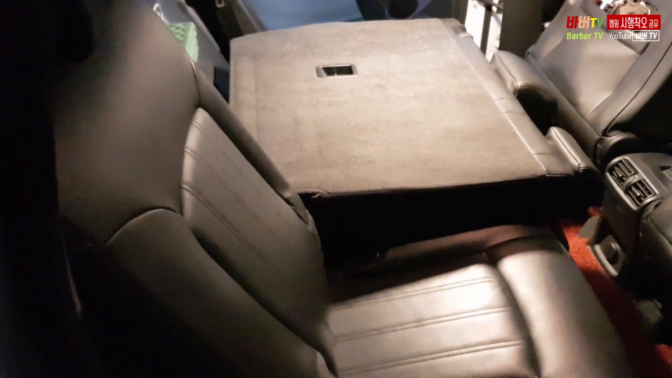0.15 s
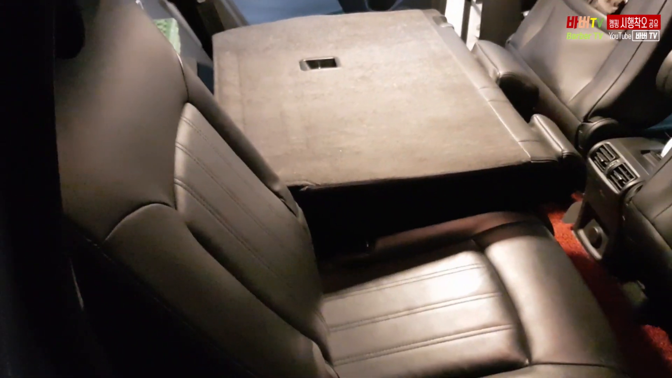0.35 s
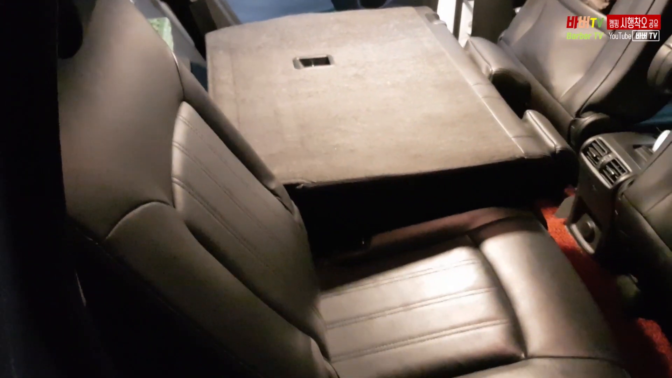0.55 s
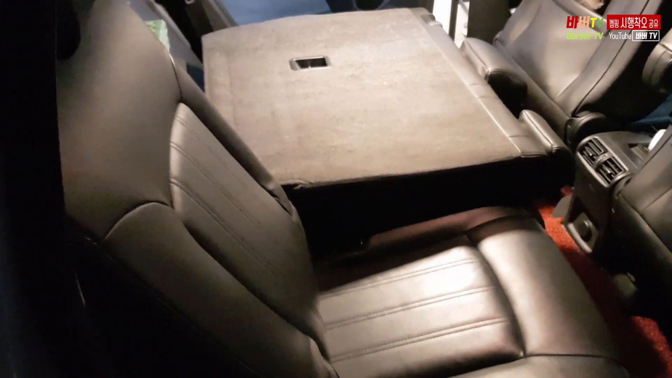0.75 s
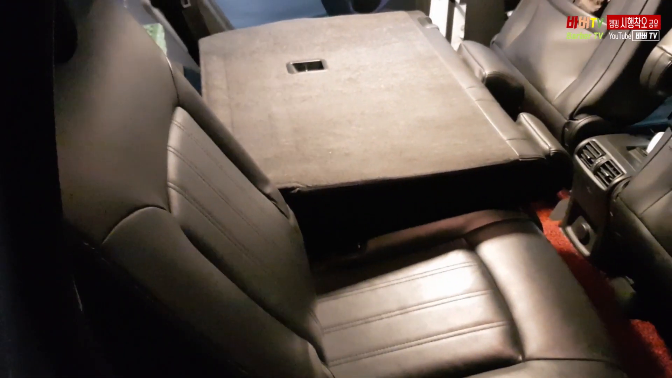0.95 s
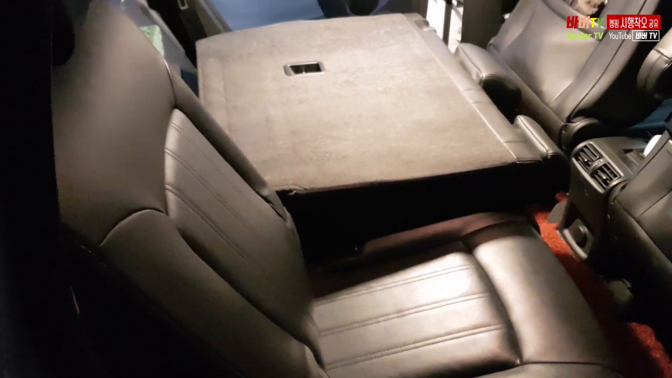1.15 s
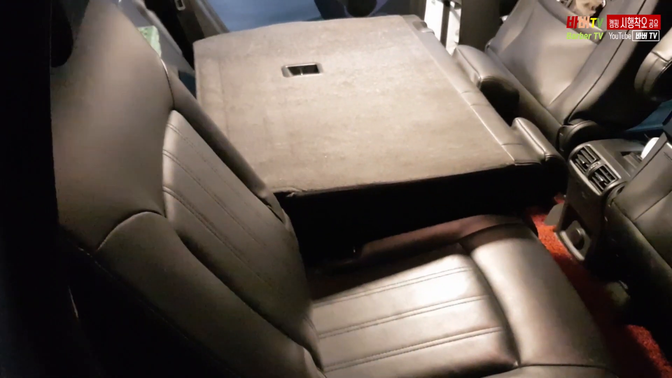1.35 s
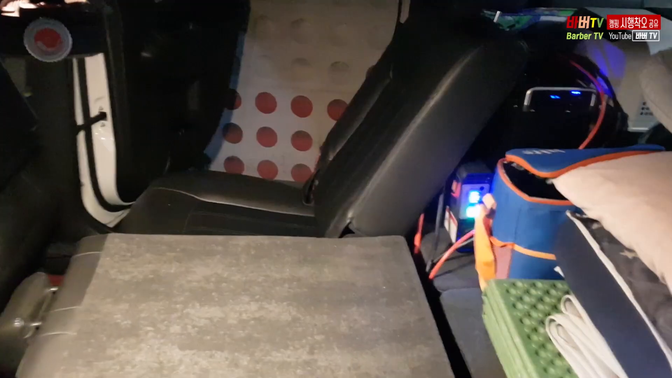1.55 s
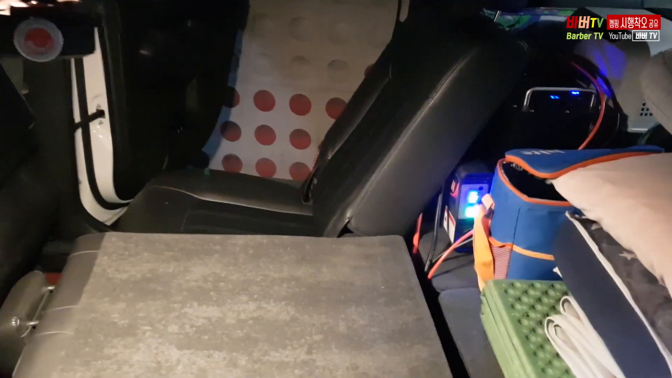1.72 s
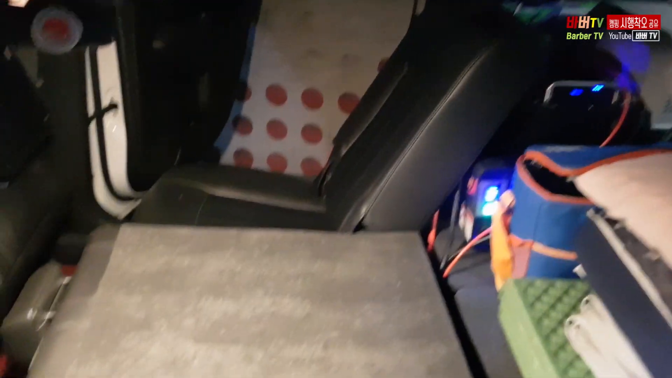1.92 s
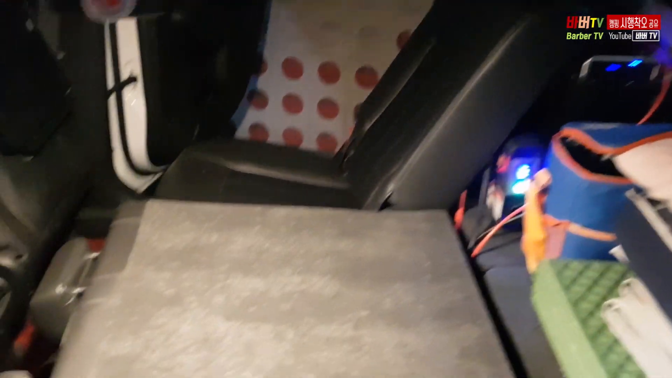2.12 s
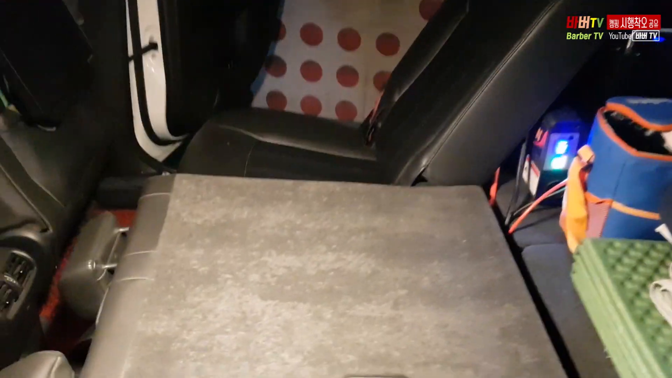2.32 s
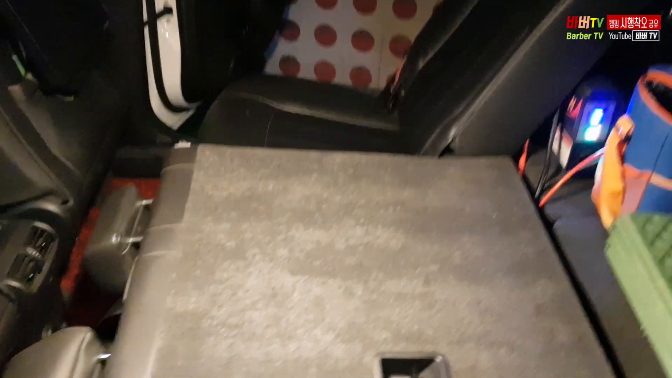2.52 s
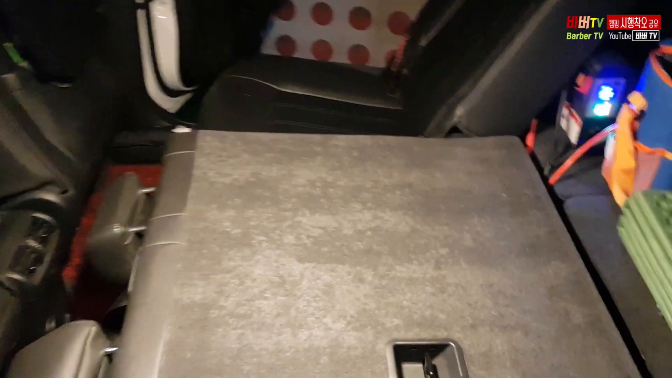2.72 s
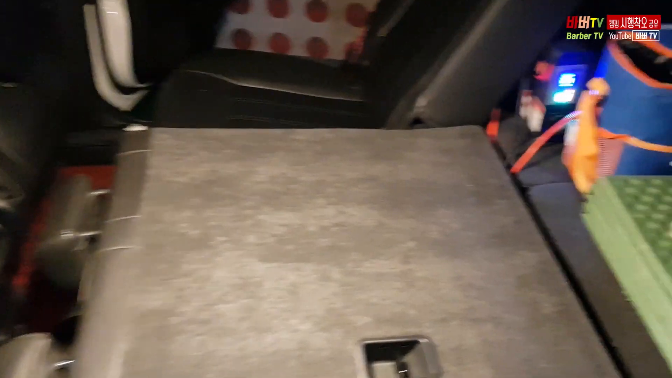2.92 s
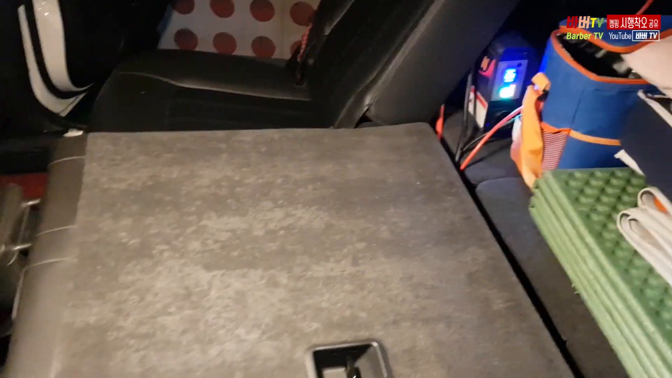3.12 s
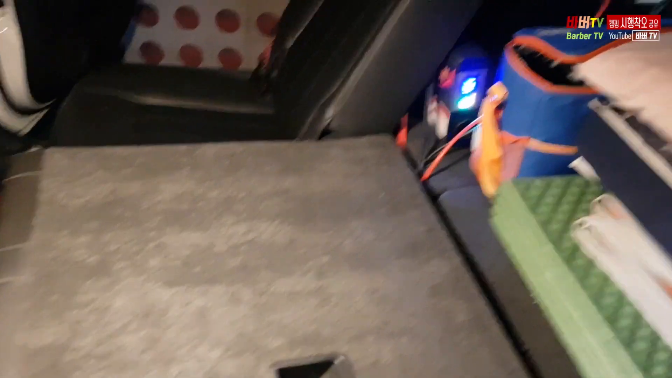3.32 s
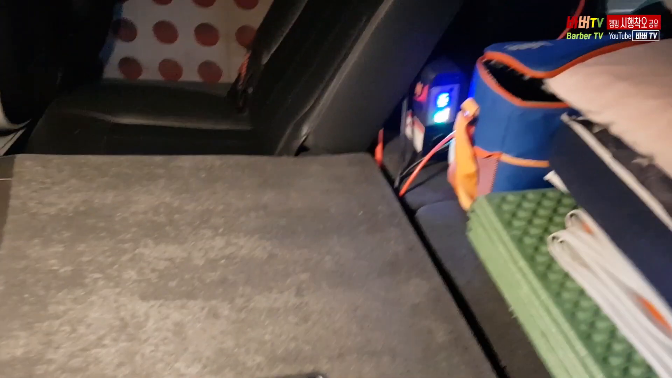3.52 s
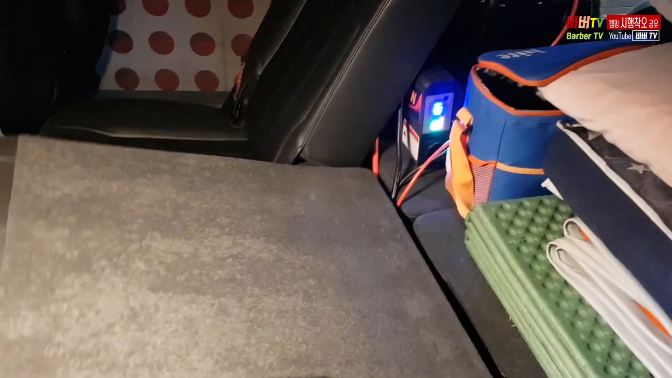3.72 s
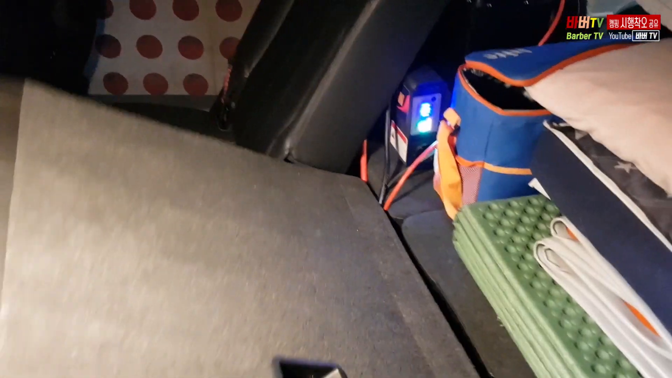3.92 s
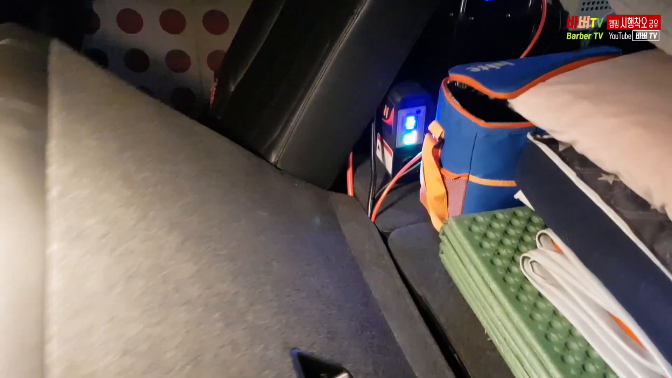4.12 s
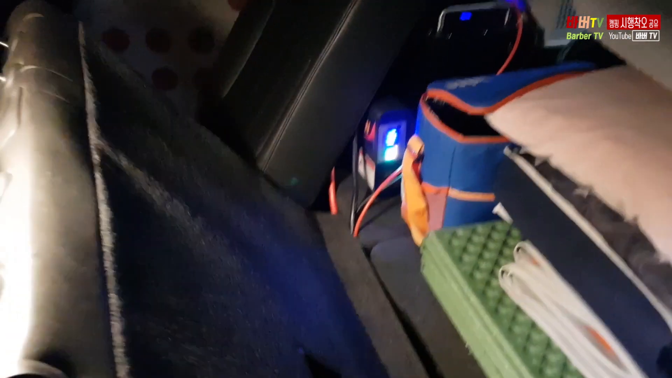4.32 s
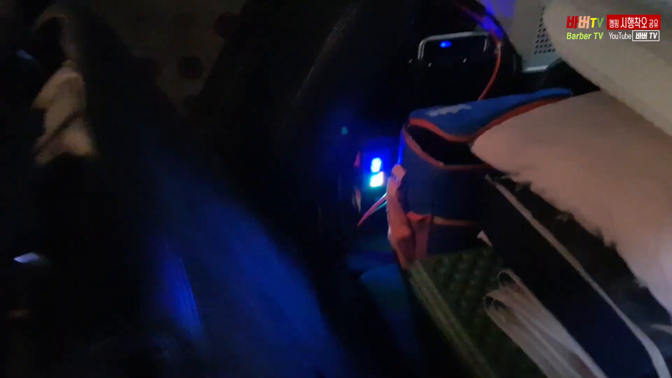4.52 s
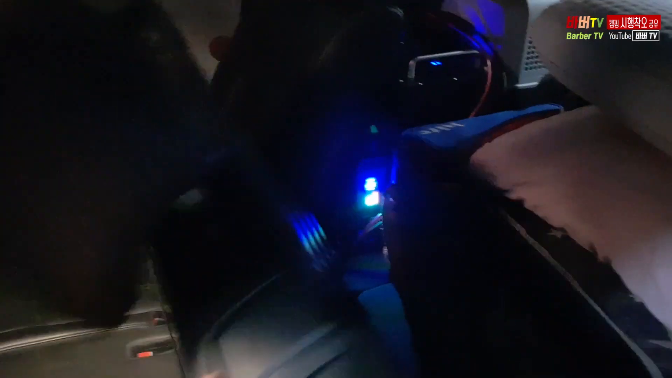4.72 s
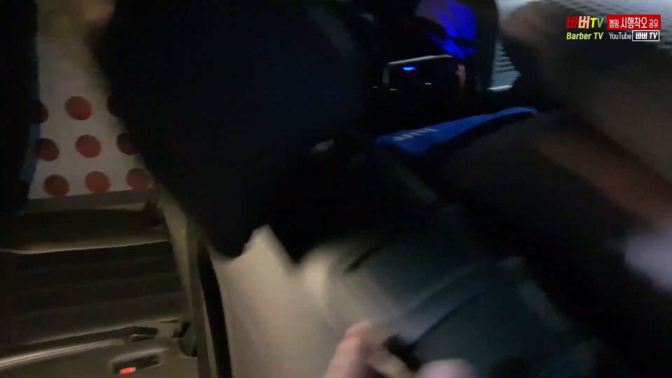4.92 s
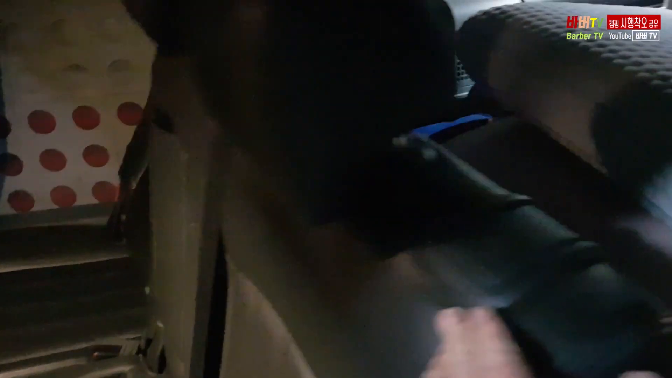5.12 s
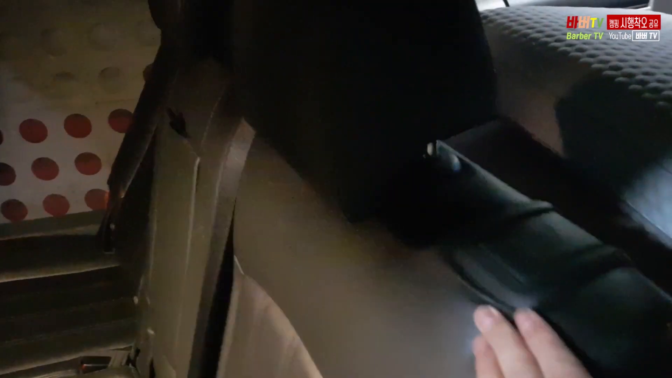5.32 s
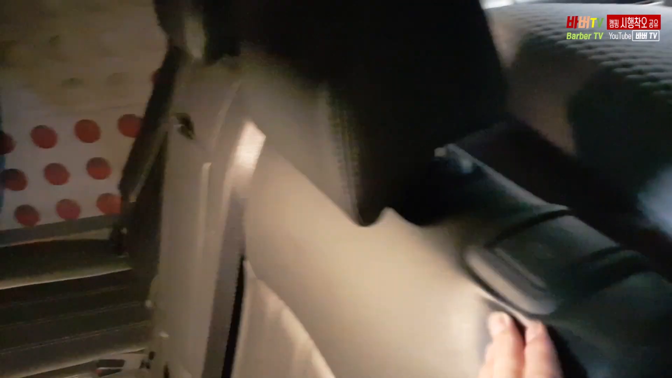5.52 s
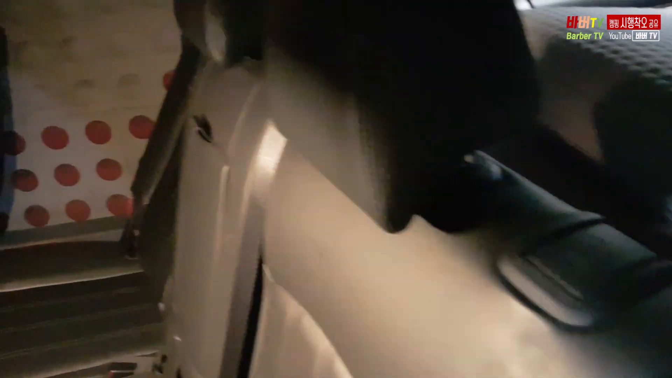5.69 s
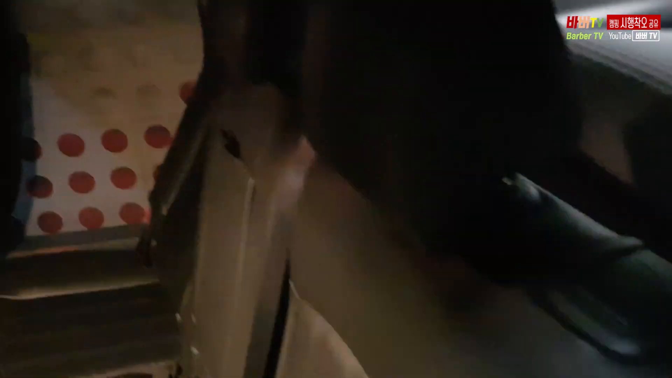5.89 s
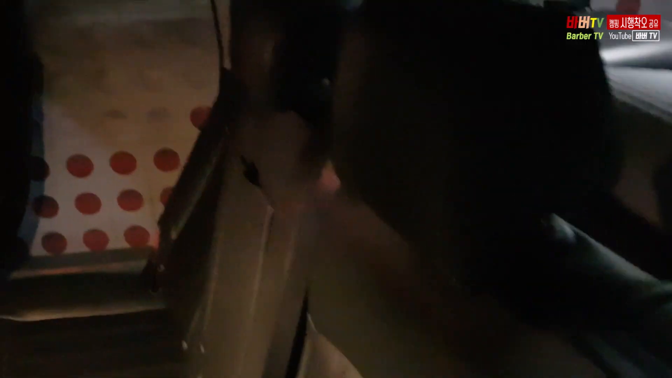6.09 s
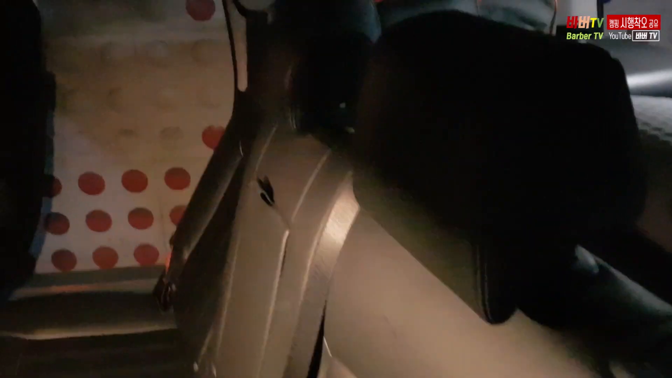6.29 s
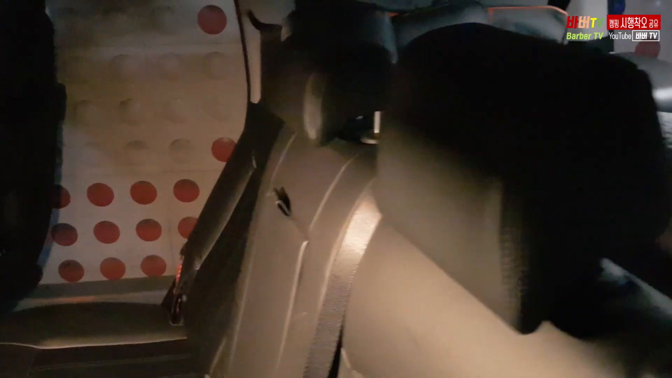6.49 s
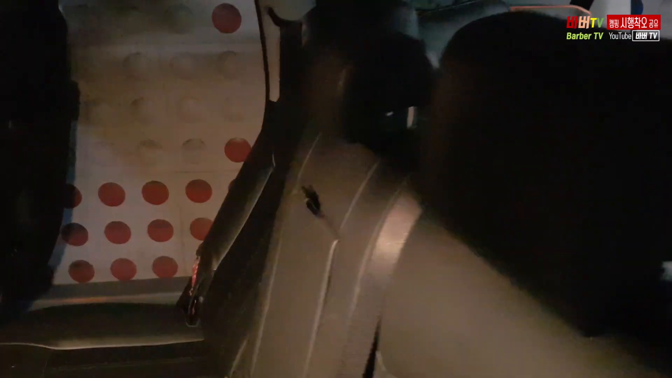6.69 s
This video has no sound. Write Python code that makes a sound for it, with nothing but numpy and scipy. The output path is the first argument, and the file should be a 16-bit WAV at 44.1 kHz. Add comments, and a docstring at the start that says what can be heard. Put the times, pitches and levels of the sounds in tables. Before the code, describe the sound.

Close stereo handheld microphone in a small padded car cabin. A rear seatback latch clacks with short squeaks and leather rubbing, then near quiet with faint cloth swishes. Light ticks and rustles follow, a double clunk just past three seconds, then a dense run of clacks, leather scrapes and bright belt-tongue jingling, ending in a heavy locking thud that leaves trim buzzing, then low rumble.

```python
"""A latch clacks and squeals while leather rubs: a rear seatback is folded and latched in a parked car.
Cloth swishes; later the frame thuds into its stops, a belt tongue jingles, a spring pings.
Contacts and rubbing are shaped noise; squeals, thuds, tongue and spring are sums of sines.
Low noise rumbles underneath, trim buzzes after the lever release and heavy blows;
heard from a hand-held stereo microphone."""
import sys
import numpy as np
from scipy import signal
from scipy.fft import rfft, irfft, next_fast_len
from scipy.io import wavfile

SR = 44100
rng = np.random.default_rng(int(sys.argv[2]) if len(sys.argv) > 2 else 0)


def boost(x):
    """Linear amplitude factor 10**(x/20) for a level x in decibels (scalar or array-like)."""
    u = np.asarray(x, float) / 20
    return 10 ** u


def file_out(sig):
    """Save sig as 16-bit WAV at sys.argv[1]."""
    # one column per channel
    cols = np.atleast_2d(sig).T
    # limit, then scale
    lim = np.clip(cols, -1, 1)
    pcm = np.round(lim * 32767).astype(np.int16)
    wavfile.write(sys.argv[1], SR, pcm)


N = 297660

# Levels are relative: band trims and pans in the functions add to them. Positive pan: left louder.
# steady hiss spectrum: f/Hz, density/dB per Hz
HISS = [(410, -29.5), (700, -3.5), (864, -8), (1950, -6), (8750, -19.5), (12000, -9.5), (15000, -7.5),
        (16200, -16)]
# correlation of left and right noise: f/Hz, correlation
LIKENESS = [(60, 0.96), (180, 0.94), (550, 0.64), (1650, 0.047), (4970, 0.054), (15000, 0.037)]
# cabin reflection tails: upper edge/Hz, level/dB, t60/s
CABIN = [(2500, -19, .22), (12000, -17, .07)]
# seat and cabin shudder: t/s, deep level/dB, upper level/dB
SHUDDER = [(0.0, -41, -59), (0.3, -48, -55), (0.64, -48, -61), (0.94, -52.5, -72.5), (0.99, -48, -52.5),
           (1.18, -49.5, -65), (1.4, -43, -62), (1.75, -48.5, -60), (2.18, -50.5, -60.5),
           (2.76, -61, -66.5), (3.0, -54, -59.5), (3.55, -58, -46.5), (4.4, -49, -47), (4.6, -47, -34),
           (5.04, -43.5, -41.5), (5.3, -46.5, -43.5), (5.95, -49, -63.5), (6.75, -46, -62)]
# deep shudder spectrum: f/Hz, density/dB per Hz
DEEP = [(12, -35.5), (20, -14), (38, -4.5), (54, 2), (110, -10.5), (130, -6.5), (170, -37.5), (290, -120)]
# upper shudder spectrum: f/Hz, density/dB per Hz
UPPER = [(65, -35), (110, -0.5), (226, -4.5), (265, -5.5), (412, -12), (487, -15), (544, -18.5), (685, -21),
         (1000, -25.5), (1300, -49), (2200, -120)]
# lever release and heavy blows that leave trim buzzing:
# t/s, trim buzz/dB, extra for its lowest bands/dB, shudder/dB
AFTERSHAKE = [(.165, -35, -21.5, -60), (3.247, -35, 0.5, -33), (5.273, -25.5, -2, -14.5)]
# buzzing trim bands: low edge/Hz, high edge/Hz, level/dB, t60/s
TRIM_BANDS = [(590, 1000, 1, 0.5), (1060, 1770, -1.5, 0.88), (1624, 2200, -0.5, 0.32),
              (2627, 4500, -14, 0.26)]
# car body rocking, one event: t/s, level/dB, f/Hz, t60/s
SWAY = (5.285, -23, 44, 1.1)
# cloth strokes: start/s, crest/s, end/s, level/dB
SWISHES = [(0.72, 0.82, 1.06, -59.5), (0.93, 1.0, 1.14, -66), (1.2, 1.3, 1.53, -57)]
# cloth spectrum: f/Hz, density/dB per Hz
CLOTH = [(710, -17), (1200, -3), (1870, 0.5), (2330, -5), (2470, -3.5), (5240, 1), (7580, -4), (8500, -18),
         (11000, -51), (18700, -120)]
# finger taps: t/s, level/dB
TAPS = [(1.589, -49.5), (1.634, -54), (1.6661, -27), (5.605, -24.5)]
# small spring pings: t/s, level/dB
PINGS = [(5.4085, -55), (5.5574, -53), (5.67, -48), (5.7947, -57.5)]
# spring modes: f/Hz, level/dB, t60/s
SPRING = [(4430, -1, 0.1), (4560, -11, 0.24), (4600, -13, .15)]
# rustle of the moving seat: t/s, body level/dB, treble re body/dB, pan of leather rub and rasp/dB
RUSTLE = [(0, -46.5, -13.5, 0.5), (.28, -46.5, -18, 4.5), (.5, -64, -17.5, 1), (.7, -76, 5, 2.5),
          (1.55, -78.5, -1.5, 5), (1.7, -68, 0.5, 5.5), (1.8, -63.5, -4, -7), (2.15, -69.5, -2, -4),
          (2.25, -76.5, -1, 1), (2.5, -78.5, 2.5, -5), (2.8, -66.5, 6.5, -0.5), (3.2, -58.5, -1.5, -2),
          (3.7, -59, -8, -5), (4.0, -58, -2, -6.5), (4.2, -49, -7.5, -5), (4.7, -46, -1.5, -1),
          (4.9, -48.5, -5, 0), (5.24, -54, -3.5, -0.5), (5.45, -74, 2.5, -1), (5.95, -80.5, 5, 3.5),
          (6.2, -95, 1, 2)]
# leather strokes (abrupt ones have a nominal end before the crest):
# start/s, crest/s, nominal end/s, body level at crest/dB, treble re body/dB
RUBS = [(0.0, 0.001, 0.044, -31.5, -17), (0.026, 0.06, 0.17, -17.5, -19.5),
        (0.153, 0.161, 0.235, -31.5, -12), (1.593, 1.599, 1.66, -73, 12), (1.767, 1.82, 1.895, -47.5, -5.5),
        (1.931, 1.952, 2.035, -46.5, -7), (2.518, 2.675, 2.756, -47, -6.5), (3.021, 3.042, 3.12, -51, -5.5),
        (3.079, 3.11, 3.2, -48, -8), (3.218, 3.219, 3.214, -34, -10.5), (3.29, 3.3, 3.37, -48.5, -3.5),
        (3.427, 3.441, 3.62, -49, -13.5), (4.013, 4.023, 4.12, -35, -9), (4.191, 4.355, 4.4, -33.5, -9),
        (4.463, 4.5, 4.55, -35.5, -13.5), (4.553, 4.563, 4.53, -24, -6), (4.581, 4.598, 4.7, -34.5, -5.5),
        (4.764, 4.772, 4.82, -40, -5.5), (4.984, 4.999, 5.01, -40, -6), (5.25, 5.257, 5.35, -27.5, -19),
        (5.602, 5.66, 5.69, -64.5, 10)]
# leather body spectrum: f/Hz, density/dB per Hz
RUB_BODY = [(410, -47), (700, -28.5), (900, -22.5), (1190, -11.5), (1650, -4.5), (2050, 0), (2350, -4.5),
            (2710, -9), (3500, -11.5), (6000, -25), (9000, -69.5)]
# leather treble spectrum: f/Hz, density/dB per Hz
RUB_TREBLE = [(2060, -24.5), (3500, -7.5), (5090, -3), (5640, -5), (6490, -1), (7460, 2), (8150, -5),
              (10400, -6), (11800, -4.5), (14600, -15), (16000, -18.5)]
# latch lever squeals: crest/s, level/dB, f at crest/Hz, time to -11 dB/s, glide/Hz per s
SQUEALS = [(0.04, -13, 2350, 0.0058, 1), (0.064, -12.5, 2270, 0.0038, 4.5), (0.074, -15, 1817, .008, 3),
           (0.133, -4.5, 2280, 0.0032, -0.5), (0.143, -13.5, 2270, 0.0036, 0),
           (0.149, -15, 2020, 0.0026, -1.5), (.1565, -5.5, 2260, 0.0026, -1),
           (0.162, -19.5, 2290, 0.0034, 2), (3.114, -45, 1140, 0.014, 2514),
           (3.141, -45.5, 1212, 0.022, 3500), (5.86, -64, 1325, 0.049, -600)]
# belt tongue touches: t/s, high groups/dB, lowest group/dB, middle groups/dB
JINGLES = [(4.5665, -26.5, -35.5, -30.5), (4.5941, -28, -39, -32), (4.6094, -26, -38.5, -34),
           (4.6458, -21.5, -30.5, -24.5), (4.664, -14.5, -25, -28.5), (4.6895, -30, -34, -31),
           (4.7159, -37, -33, -40), (4.7462, -28, -20.5, -39), (4.7552, -24.5, -29.5, -42),
           (4.7746, -34.5, -32.5, -43), (4.8614, -65, -41, -72), (4.8978, -44, -36.5, -55),
           (4.9222, -35, -32, -47), (4.9571, -28.5, -38, -30), (4.9632, -27.5, -24.5, -35),
           (4.9773, -27, -25.5, -32), (5.0013, -39, -33.5, -38), (5.0176, -41, -32, -45),
           (5.0681, -36.5, -50, -44), (5.098, -49.5, -57.5, -60)]
# belt tongue modes in five groups: f/Hz, level/dB, t60 without webbing/s
TONGUE = [
    [(13782, 0, .2)],
    [(7420, 0, .1), (8210, -15, .3)],
    [(10525, 0, .3)],
    [(11955, 0, .4)],
    [(14086, 0, .2), (12592, -6, .08)],
]
# frame blows: t/s, knock level/dB, deep swing level/dB, swing f/Hz, nominal t60/s
THUDS = [(1.665, -33.5, -21, 86, 0.092), (3.242, -19, -44, 80, 0.36), (3.261, -27, -22, 88.2, 0.29),
         (3.277, -17, -41, 72, .14), (3.309, -24.5, -31, 109.9, 0.32), (3.336, -29.5, -20.5, 80.4, 0.24),
         (3.436, -42, -38, 85.92, 0.17), (3.968, -34.5, -30.5, 91.3, 0.12), (4.388, -18.5, -29, 113, 0.23),
         (4.405, -23.5, -33, 111, 0.12), (4.439, -18, -37, 108.7, 0.086), (4.663, -21.5, -37, 95, 0.12),
         (4.68, -28.5, -20.5, 55.4, 0.091), (4.983, -24, -32.5, 99.53, .31), (5.011, -29.5, -33, 51, 0.1),
         (5.269, -12, -22, 109.9, .3), (5.287, -9.5, -14.5, 114, 0.16), (5.3, -19.5, -37, 59, 0.27),
         (5.347, -21.5, -14, 90.7, 0.19), (5.41, -41, -20, 45.8, 0.11)]
# seat frame modes: f/Hz, level/dB, t60 as share of the blow's nominal t60
FRAME = [(161.1, -3.5, 0.8), (200.2, -2.5, .7), (256, -2.5, .7), (310, -3.5, .6), (389, -5.5, 0.49),
         (482, -8, .5), (626, -16, .25), (804, -15.5, .12)]
# latch and trim contacts: t/s, level/dB, edge re body/dB, treble/dB, pan/dB
CLACKS = [(0.025, -8.5, -15.5, -38, 2.5), (0.063, -17, -23.5, -36, -0.5), (0.123, -16, -14.5, -31.5, 0),
          (0.151, -10.5, -10, -28, -3.5), (1.587, -50, -21, -12, -5), (1.633, -58, -10, 15, 4),
          (1.666, -34, -7, 2, -3), (1.776, -46.5, -1.5, -3, 3), (1.801, -37.5, -6.5, -13.5, 2.5),
          (1.821, -36.5, -14, -9.5, -5.5), (1.833, -39.5, -3.5, -6, -1.5), (1.856, -34.5, -10.5, -6, -7.5),
          (1.884, -39, -11, -12.5, 3), (1.937, -42, 1.5, -15, -2.5), (2.016, -43, -9, -20, -3.5),
          (2.157, -54.5, -7.5, 3, 10), (2.524, -45.5, 4.5, -30, -8), (2.665, -38, -6, -2.5, -7),
          (2.922, -44, -7, 2, -5), (3.017, -43, -15, -5.5, -8.5), (3.03, -43, -23, 5.5, -2),
          (3.124, -32.5, -10.5, -22.5, -4.5), (3.222, -32, -12, -12, -4.5), (3.242, -14, -15.5, -13.5, 0.5),
          (3.279, -16, -28.5, -19.5, 1), (3.337, -30.5, -15, -22, 3), (3.589, -41, -25.5, -12.5, 1.5),
          (3.616, -39, -39, -21, -15), (3.94, -43.5, -27, -5.5, -1.5), (4.014, -20, -21, -13.5, -6.5),
          (4.032, -32, -20, -9.5, -10.5), (4.067, -31.5, -14, -14, -10.5), (4.094, -32.5, -14, -7, -4.5),
          (4.145, -29, -22.5, -10, -5.5), (4.194, -31.5, -22.5, -14, -8), (4.307, -27, -8.5, -17, -8.5),
          (4.334, -23.5, -7, -10.5, -1.5), (4.347, -20.5, -13.5, -10.5, -5), (4.385, -4, -17, -19, -1),
          (4.44, -5, -13.5, -8, -1), (4.566, -0.5, -6.5, -19, 2.5), (4.646, -18.5, -8.5, 0, -2),
          (4.66, -13.5, -9, 1.5, 2.5), (4.677, -25.5, -6, 5.5, -4), (4.747, -15.5, -7.5, -9.5, 1.5),
          (4.804, -21.5, -4, -13, 2.5), (4.825, -25, -5.5, -18, 2.5), (4.953, -33, -1.5, 11.5, 3.5),
          (4.979, -19, -6.5, -3.5, -6.5), (5.065, -23.5, -9.5, -9, 2), (5.098, -35.5, -12, -13, -1),
          (5.162, -39, -7.5, -14, 4), (5.253, -16, -20, -30, -2), (5.269, 1.5, -20, -26, -2),
          (5.276, -8, -21.5, -27, -1), (5.295, -23, -29.5, -37, 7), (5.31, -29.5, -29, -25, -1),
          (5.325, -21, -31.5, -37, -4), (5.605, -37, -29.5, -14.5, -4)]
# latch modes: f/Hz, level/dB, t60/s
LATCH = [(1300, -6, .02), (2100, 0, .025), (2700, -6, .02)]
# contact body spectrum: f/Hz, density/dB per Hz
CLACK_BODY = [(250, -29.5), (500, -16.5), (900, -4.5), (1500, -2.5), (2060, -4), (3000, -10.5),
              (4500, -23.5), (8000, -69.5)]
# contact edge spectrum: f/Hz, density/dB per Hz
CLACK_EDGE = [(1800, -41), (3000, -4.5), (4300, -1), (5400, 0.5), (6500, -7), (10000, -36)]
# contact treble spectrum: f/Hz, density/dB per Hz
CLACK_TREBLE = [(3530, -33.5), (6000, -5), (6460, -8), (7550, 2), (9080, -6), (12800, -3.5), (15200, -8),
                (16000, -20.5)]


def rms_one(x):
    """Scale to rms 1."""
    return x / np.sqrt(np.mean(x ** 2) + 1e-20)


def in_time(rows):
    """Columns of a curve table at every sample."""
    s, *columns = np.transpose(rows)
    return [np.interp(np.arange(N) / SR, s, c) for c in columns]


def drift(rate_hz):
    """Slow chance, rms 1: noise through two poles at rate_hz, run at SR / 40."""
    r = np.exp(-80 * np.pi * rate_hz / SR)
    white = rng.standard_normal(N // 40 + 2002)
    slow = signal.lfilter([1], [1, -2 * r, r * r], white)[2000:]
    return np.interp(np.arange(N) / 40, np.arange(len(slow)), rms_one(slow))


def at_hz(points, hz):
    """A spectrum read on a log-frequency axis."""
    table_hz, values = np.transpose(points)
    return np.interp(np.log(hz), np.log(table_hz), values)


def coloured(spectrum, grain_db=0.):
    """Stereo noise of a given spectrum, rms 1, alike in the bass; grain makes sample sizes uneven."""
    size = next_fast_len(N)
    white = rng.standard_normal((2, N)) * boost(grain_db * np.minimum(rng.exponential(1, N), 6))
    mid, side = rfft(white, size)
    hz = np.maximum(np.arange(len(mid)) * SR / size, 1)
    alike = np.clip(at_hz(LIKENESS, hz), -.9, 1)
    both = np.sqrt(1 + alike) * mid + np.sqrt(1 - alike) * side * [[1], [-1]]
    return rms_one(irfft(both * boost(at_hz(spectrum, hz)), size)[:, :N])


def sides(pan_db):
    """Left and right gains."""
    return boost(np.array([pan_db / 2, -pan_db / 2]))


def add(out, s, piece):
    """Mix a piece in at s seconds."""
    i = round(s * SR)
    out[..., i:i + piece.shape[-1]] += piece[..., :N - i]


def rung(modes, t, spread_db, stretch=1, detune=0.):
    """Struck modes: decaying sines, each with a chance strength and slight tuning of its own."""
    total = 0
    for hz, db, t60 in modes:
        level = boost(db + spread_db * rng.standard_normal() - 60 * t / (t60 * stretch))
        tuned_hz = hz * (1 + detune * rng.standard_normal())
        total = total + level * np.sin(2 * np.pi * tuned_hz * t)
    return total


def strokes(rows, start_drop_db, end_drop_db, lift_s):
    """Each stroke swells to a crest and falls away, some cut off at once; one gain curve each."""
    t = np.arange(N) / SR
    shape_db = [-100, -start_drop_db, 0, -end_drop_db, -100]
    return np.array([boost(db + np.interp(t, [start - .002, start, crest, end, end + lift_s], shape_db))
                     for start, crest, end, db, *_ in rows])


def rub_strokes():
    """Gain curves of the leather strokes, shared by rub and rasp."""
    return strokes(RUBS, start_drop_db=10, end_drop_db=11.5, lift_s=100 / 1499)


def hiss():
    """Steady noise floor."""
    return boost(-74) * coloured(HISS)


def cabin(x):
    """Dense reflections off glass and trim: a dull longer tail and a bright short one."""
    t = np.arange(SR // 3) / SR
    echo = 0
    for cut_hz, db, t60 in CABIN:
        tail = rng.standard_normal((2, len(t))) * boost(-60 * t / t60) * (t > .002)
        tail = signal.sosfilt(signal.butter(2, cut_hz, fs=SR, output="sos"), tail)
        echo = echo + boost(db) * tail / np.sqrt(np.sum(tail ** 2) / 2)
    return signal.fftconvolve(x, echo, axes=1)[:, :N]


def shudder():
    """Lumpy low noise; at each aftershake it wells up by the listed level and dies away."""
    rise_s, t60_s = 0.082, 0.89
    deep_db, upper_db = in_time(SHUDDER)
    shake, t = np.zeros(N), np.arange(SR) / SR
    for s, *_, db in AFTERSHAKE:
        add(shake, s, boost(db - 60 * t / t60_s) * (1 - np.exp(-(t / rise_s) ** 3)))
    lump_db = 2.2 * drift(5)
    deep = (boost(deep_db) + shake) * boost(lump_db) * coloured(DEEP)
    upper_gain = (boost(upper_db) + boost(-4.0) * shake) * boost(1.3 * lump_db + 0.5 * drift(22))
    return deep + upper_gain * coloured(UPPER)


def sway():
    """The locked seatback rocks the car body at its lowest mode: one decaying sine."""
    start_s, db, hz, t60_s = SWAY
    t = np.maximum(np.arange(N) / SR - start_s, 0)
    return boost(db - 60 * t / t60_s) * np.sin(2 * np.pi * hz * t) * (1 - np.exp(-t / .015))


def aftershake():
    """Trim buzzes on after the lever release and heavy blows: noise bands, each with its own decay."""
    noise = coloured([(100, 0), (9000, 0)])
    out, t = np.zeros((2, N)), np.arange(SR) / SR
    for low_hz, high_hz, band_db, t60 in TRIM_BANDS:
        fade = np.zeros(N)
        for s, db, low_share_db, _ in AFTERSHAKE:
            share_db = low_share_db if low_hz < 1200 else 0
            add(fade, s, boost(db + share_db + band_db - 60 * t / t60) * (1 - np.exp(-t / 0.0016)))
        band_filter = signal.butter(2, [low_hz, high_hz], "band", fs=SR, output="sos")
        band = signal.sosfilt(band_filter, noise)
        out += fade * rms_one(band) * boost(1.5 * drift(30))
    return out


def swish():
    """Smooth cloth noise, inaudible outside its strokes."""
    gain = strokes(SWISHES, start_drop_db=14, end_drop_db=14.5, lift_s=100 / 397.5).sum(axis=0)
    return sides(5.5)[:, None] * gain * coloured(CLOTH)


def taps():
    """A finger on the microphone casing gives one dry swing of about a millisecond."""
    out, t = np.zeros(N), np.arange(-200, 300) / SR
    swing = np.sin(2 * np.pi * 650 * t) * np.exp(-(t / .0007) ** 2)
    for s, db in TAPS:
        add(out, s - 200 / SR, boost(db) * swing)
    return out


def pings():
    """Close spring modes beat and flutter as they die."""
    out, t = np.zeros(N), np.arange(SR // 5) / SR
    for s, db in PINGS:
        ring = rung(SPRING, t, spread_db=0.5, detune=.006)
        add(out, s, boost(db) * ring * (1 - np.exp(-t / 0.0021)))
    return out * boost(3.5 * drift(120))


def rub():
    """Stick-slip leather noise: body and treble share the uneven drag and its sudden slips."""
    slips_per_s, slip_db, slip_t60_s = 83, -8.5, 0.063
    rustle_db, share_db, pan_db = in_time(RUSTLE)
    gains = rub_strokes()
    slips = (rng.random(N) < slips_per_s / SR) * boost(slip_db) * np.minimum(rng.exponential(1, N), 2.5)
    slip_trace = signal.lfilter([1], [1, -boost(-60 / (slip_t60_s * SR))], slips)
    drag = boost(1.6 * drift(30)) * rms_one(1 + slip_trace)
    body_gain = (boost(rustle_db) + drag * gains.sum(axis=0)) * boost(1.5 * drift(40))
    treble_strokes = boost(np.array(RUBS)[:, -1]) @ gains
    treble_gain = (boost(rustle_db + share_db) + drag ** 0.42 * treble_strokes) * boost(1.4 * drift(40))
    body = body_gain * coloured(RUB_BODY, grain_db=3.3)
    treble = treble_gain * coloured(RUB_TREBLE, grain_db=2.5)
    return sides(pan_db) * (body + treble)


def rasp():
    """Sparse catches under each stroke ring the latch modes; each mode gets catches of its own."""
    catches_per_s = 260
    t, out = np.arange(SR // 20) / SR, 0
    for mode in LATCH:
        sizes = boost(3.7 * np.minimum(rng.exponential(1, (2, N)), 4)) * rng.standard_normal((2, N))
        stereo = sizes[0] + .6 * sizes[1] * np.array([[1], [-1]])
        catches = (rng.random(N) < catches_per_s / SR) * stereo
        out = out + signal.fftconvolve(catches, rung([mode], t, spread_db=1)[None], axes=1)[:, :N]
    pan_db = in_time(RUSTLE)[2]
    return boost(-9) * sides(pan_db) * rub_strokes().sum(axis=0) * rms_one(out)


def squeals():
    """A slipping lever briefly feeds one mode, which swells and fades."""
    t, out = np.arange(N) / SR, np.zeros(N)
    for s, db, hz, half_s, glide in SQUEALS:
        dt = t - s
        out += boost(db - 11.0 * (dt / half_s) ** 2) * np.sin(2 * np.pi * (hz + glide / 2 * dt) * dt)
    return out


def jingles():
    """Each touch stops the ringing tongue and sets it going anew; it flutters as it turns on the belt."""
    webbing_db_per_s, touch_spread_db = 249, 2.5   # the belt webbing damps the ring
    groups, t = np.zeros((len(TONGUE), N)), np.arange(SR // 5) / SR
    ends = [row[0] for row in JINGLES[1:]] + [JINGLES[-1][0] + .03]
    chance = touch_spread_db * rng.standard_normal((len(JINGLES), len(TONGUE)))
    for (s, high_db, low_db, middle_db), end, luck_db in zip(JINGLES, ends, chance):
        stop_db = -2500 * np.maximum(t - min(end - s, .06), 0)
        damped = boost(stop_db - webbing_db_per_s * t) * (1 - np.exp(-t / 0.0012))
        levels_db = [high_db, low_db, middle_db, middle_db, high_db - 6] + luck_db
        for out, db, modes in zip(groups, levels_db, TONGUE):
            add(out, s, damped * boost(db) * rung(modes, t, spread_db=1.5, detune=.0015))
    left, right = [sum(ring * boost(4.5 * drift(70) + 3.5 * drift(18)) for ring in groups)
                   for side in "lr"]
    return np.array([left, np.roll(right, 4)])      # right lags 4 samples: unlike phase at the ports


def thuds():
    """The padded frame knocks at once, never twice alike; the whole seat swings deeper, building slower."""
    out, t = np.zeros((2, N)), np.arange(SR // 2) / SR
    for s, knock_db, swing_db, swing_hz, t60 in THUDS:
        mid, side = [rung(FRAME, t, spread_db=2, stretch=max(t60, .03), detune=.05) for part in "ms"]
        knock = boost(knock_db) * (mid + boost(-15.5) * side * [[1], [-1]]) * (1 - np.exp(-t / 0.0015))
        swing = boost(swing_db - 60 * t / (1.2 * t60)) * np.sin(2 * np.pi * swing_hz * t)
        swing = swing * (1 - np.exp(-t / 0.0029))
        add(out, s, knock + swing * sides(2.5)[:, None])
    return out


def clacks():
    """A contact is a short noisy crack in three bands, with the latch modes ringing."""
    body, edge, treble, rings = np.zeros((4, 2, N))
    t = np.arange(SR // 4) / SR
    for s, db, edge_db, treble_db, pan_db in CLACKS:
        gain = boost(db) * sides(pan_db)[:, None] * (1 - np.exp(-t / .0002))
        t60 = max(.085 + .0009 * db, .02)   # lighter contacts die sooner
        crack = gain * (boost(-60 * t / (0.11 * t60)) + boost(-8 - 60 * t / t60))
        treble_fade = boost(-60 * t / (0.13 * t60)) + boost(-17.0 - 60 * t / (1.8 * t60))
        add(body, s, crack)
        add(edge, s, crack * boost(edge_db))
        add(treble, s, gain * boost(treble_db) * treble_fade)
        add(rings, s, gain * rung(LATCH, t, spread_db=3, detune=.04))
    cracks = boost(-9.5) * body * coloured(CLACK_BODY) + boost(1.5) * edge * coloured(CLACK_EDGE)
    return cracks + boost(3.0) * treble * coloured(CLACK_TREBLE) + boost(-8) * rings


def scene():
    """Struck things sound in the cabin; the tongue hangs to the left, the lever to the right."""
    lows = thuds() + (shudder() + sway() + taps()) * sides(0.93)[:, None]
    rubbing = rub() + rasp() + swish()
    seat = lows + aftershake() + rubbing + squeals() * sides(-1.5)[:, None]
    struck = clacks() + jingles() * sides(5.5)[:, None] + pings()
    return hiss() + seat + struck + cabin(struck)


def low_pass(x):
    """Removes everything above the highest recorded frequency."""
    return signal.sosfilt(signal.butter(12, 16390, fs=SR, output="sos"), x)


def record(dry):
    """Peaks beyond full scale clip."""
    clipped = np.clip(dry, -1, 1)
    return low_pass(clipped)


dry = scene()
out = record(dry)
file_out(out)
```